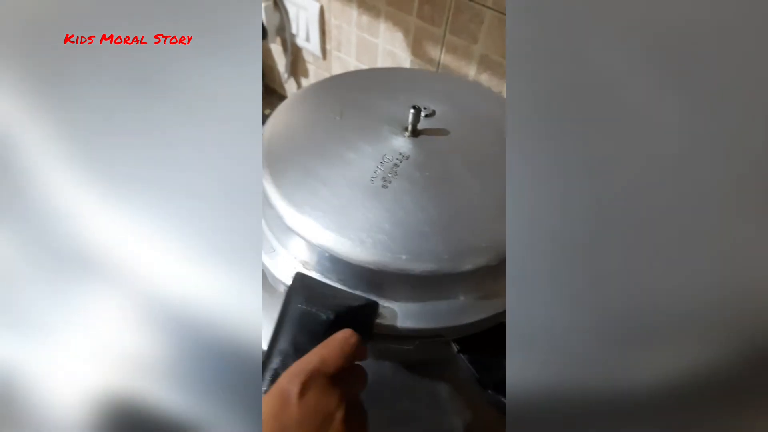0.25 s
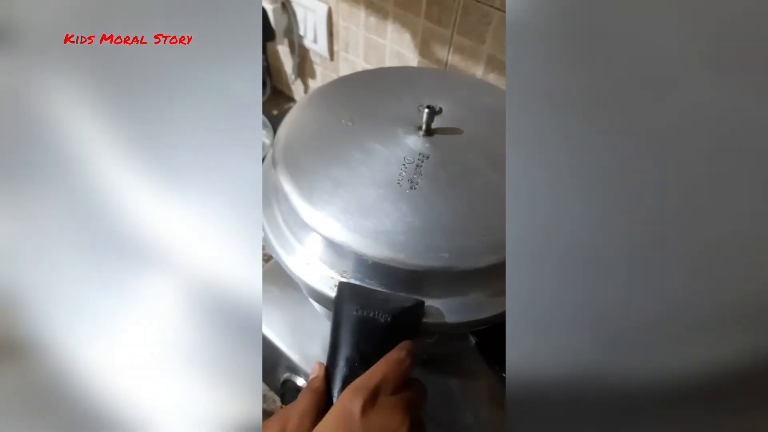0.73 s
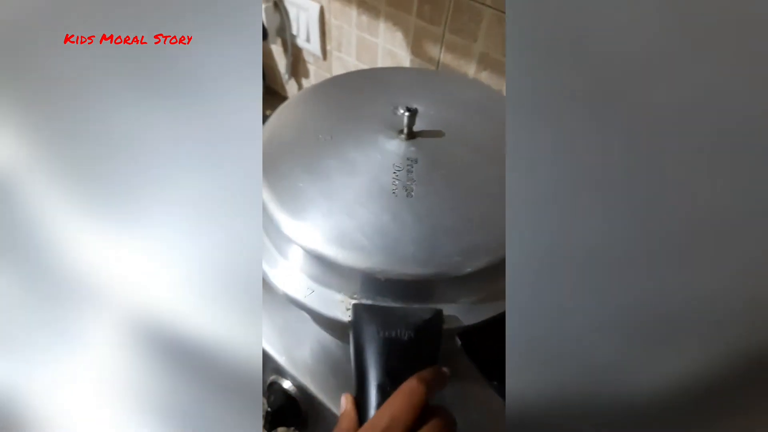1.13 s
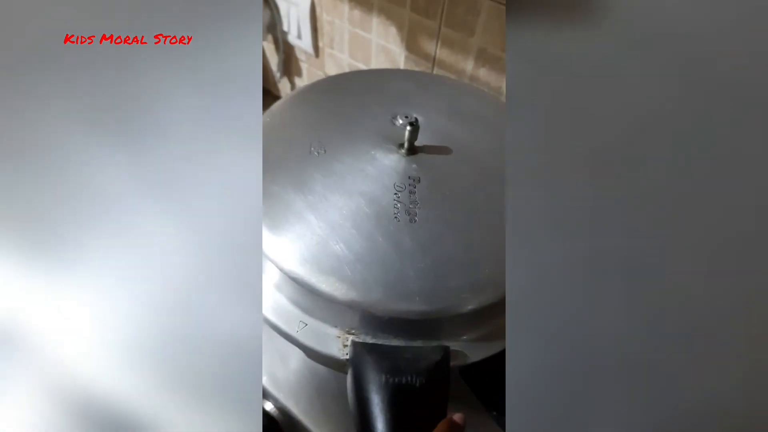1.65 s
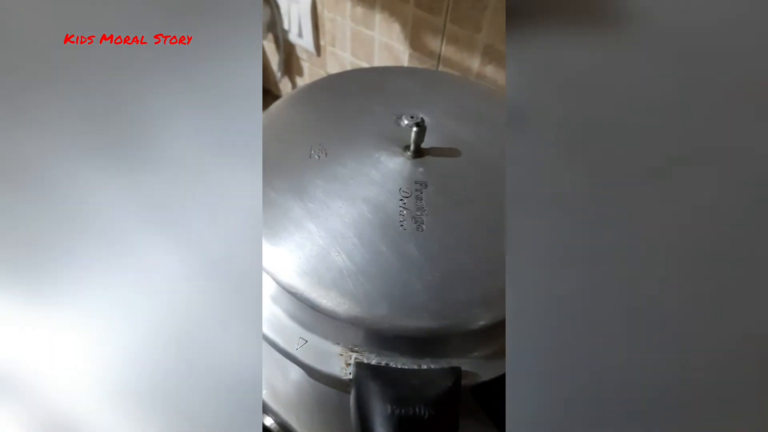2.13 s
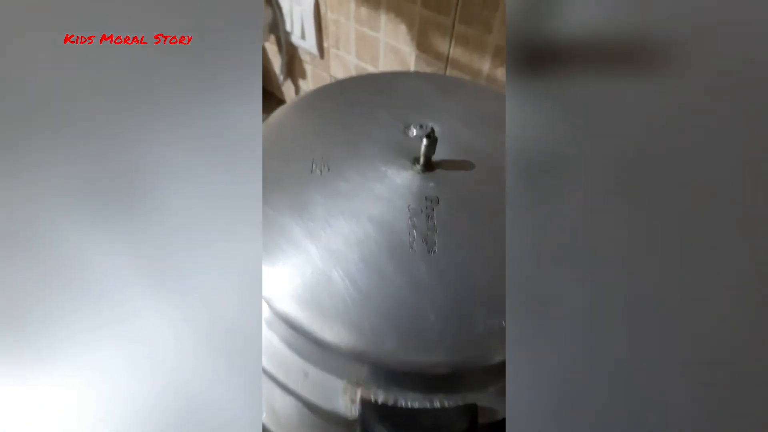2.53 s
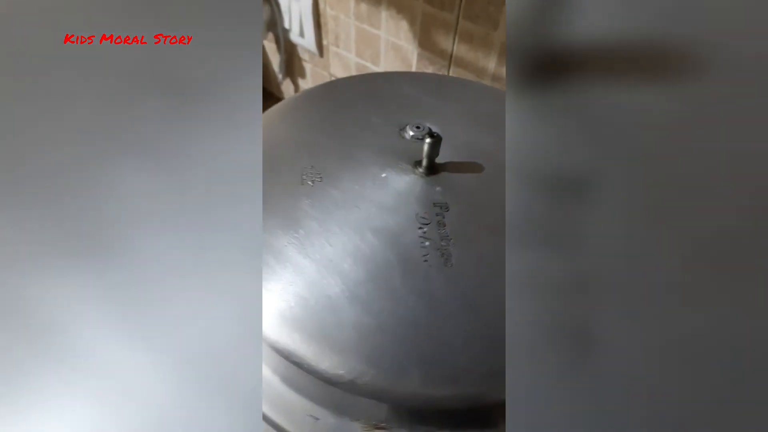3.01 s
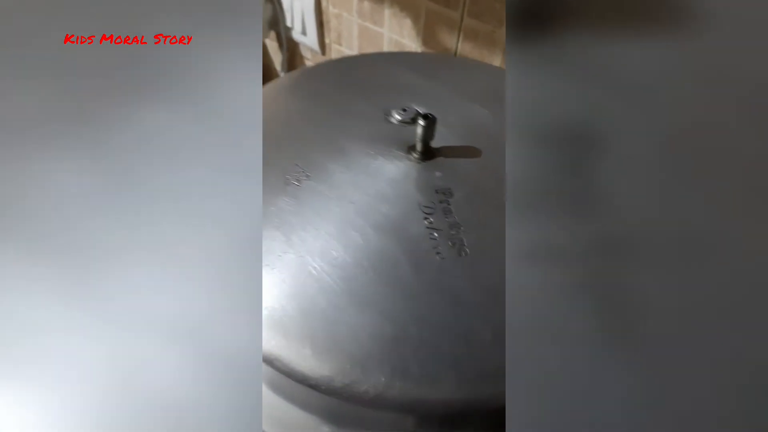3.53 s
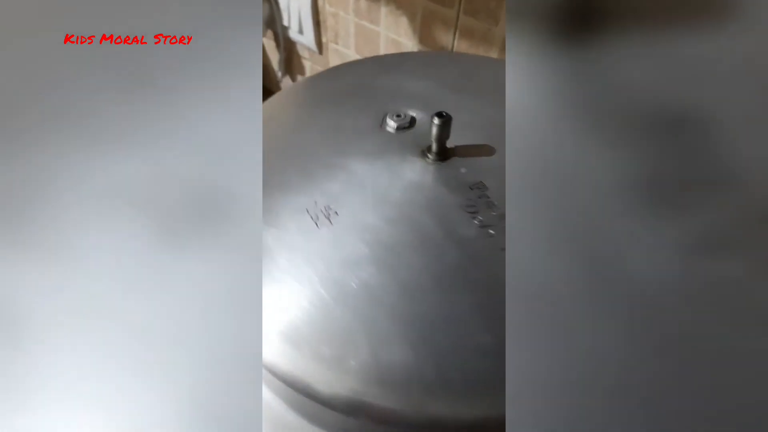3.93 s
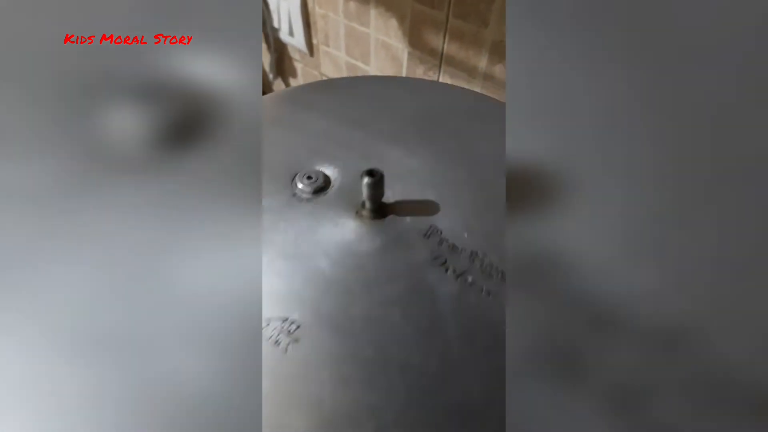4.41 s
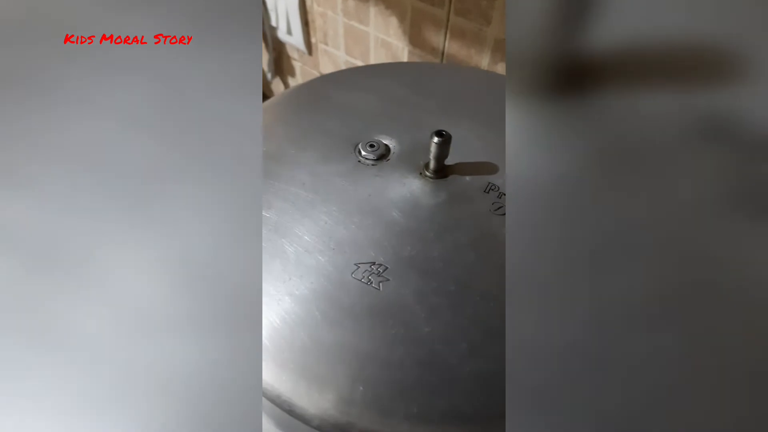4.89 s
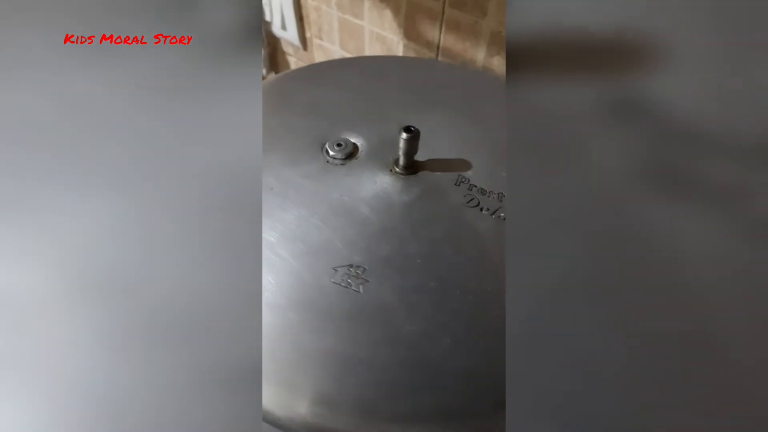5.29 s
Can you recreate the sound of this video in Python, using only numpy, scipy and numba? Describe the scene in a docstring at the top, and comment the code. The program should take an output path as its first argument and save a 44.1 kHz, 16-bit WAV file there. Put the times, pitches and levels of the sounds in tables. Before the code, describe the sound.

Close stereo sound of a heavy metal cooker lid being fitted in a small tiled kitchen, over a low wavering hum and thin air. From about 0.14 to 0.7 s irregular clanks come quickly, strongest near 0.15, 0.3 and 0.55 s, with loose rattle, short scrapes and a brief low groan of the pot wall. Until 1.4 s only soft knocks and a faint groaning drag remain. From 1.44 s scraping and medium clanks return, the groan swells near 1.53 s, and at 1.74 to 1.8 s the lid locks with the loudest, hard, clustered clank, its metallic ring dying quickly. It is nearly quiet from 2.2 to 2.9 s. Then faint grazing and light knocks follow, clearest at 3.48 and 3.81 s, with a barely audible breathy whine around 4 s. Separate bright taps land at 4.42, 5.22, 5.33 and 5.5 s as the hum rises.

```python
"""Cooker lid locked onto its pot

In a small tiled kitchen a metal lid is turned onto its pot on a stove: lugs knock and drag, the lid locks
with a clank, the pot is slid round and the lid is tapped. Knocks and friction ring one bank of damped metal
modes; the pot wall groans as gliding sines; rattle, sliding hiss and wall tail are noise in bands.
A low hum, thin room air and a faint whine of narrow noise lie underneath."""
import sys
import numpy as np
from numba import njit
from scipy import signal
from scipy.fft import rfft, irfft, next_fast_len
from scipy.io import wavfile

SR = 44100
rng = np.random.default_rng(int(sys.argv[2]) if len(sys.argv) > 2 else 0)


def inscribe(sig):
    """Save sig as 16-bit PCM at rate SR to the path in sys.argv[1].

    A 1-D sig is mono; a 2-D sig holds one channel per row.
    Samples are clipped to [-1, 1] before scaling.
    """
    pcm = np.round(np.clip(np.atleast_2d(sig).T, -1, 1) * 32767)
    wavfile.write(sys.argv[1], SR, pcm.astype(np.int16))


N = 244755
STEP = 24   # samples between gain values


def from_db(db):
    """Decibels to amplitude; twice the decibels give power."""
    return 10 ** (np.asarray(db) / 20)


def rms_one(x):
    """Scale a signal to rms 1."""
    return x / np.sqrt(np.mean(x ** 2) + 1e-20)


def in_time(rows):
    """Columns of a table as curves, one value a step; -120 outside the table."""
    s, *columns = np.transpose(rows)
    t = np.arange(N // STEP + 1) * STEP / SR
    return np.array([np.interp(t, s, c, -120, -120) for c in columns])


def every_sample(gain):
    """A gain given once a step, joined up by straight lines."""
    return np.interp(np.arange(N) / STEP, np.arange(len(gain)), gain)


def at_hz(points, hz):
    """Read a table of (hz, value) on a log frequency axis."""
    points = np.array(points)
    return np.interp(np.log(hz), np.log(points[:, 0]), points[:, 1])


def drift(rate):
    """Slow chance of spread 1, one value a step: white noise through two equal low-pass poles."""
    r = np.exp(-2 * np.pi * rate * STEP / SR)
    white = rng.standard_normal(N // STEP + 2001)
    return rms_one(signal.lfilter([1], [1, -2 * r, r * r], white)[2000:])


def dying(clicks, t60):
    """Each click starts an exponential decay."""
    return signal.lfilter([1], [1, -from_db(-60 * STEP / (t60 * SR))], clicks + 1e-18)


# Where stand, pot wall, lid dome, pot floor, rim and lugs ring most: centre_hz [Hz]
PART_HZ = [150, 258, 340, 480, 800, 1450]
# Knocks: start_s [s], level_db [dB, relative], then extra stand_db, wall_db, dome_db, lugs_db,
# hard_db (hardness of the contact) and rattle_db [dB]
KNOCKS = [(0.078, -57, 16.5, 25, 30, 14, 17.5, -13), (0.142, -6.5, -14, 4.5, -6.5, 8, 3, 2),
          (0.149, -11, 0, 1, 0, -10, -12, -23), (0.208, -15, -16, 7.5, -2, 6, -3, -13),
          (0.226, -24, 4, -14, 5, 18, 0, -2), (0.289, -8, -39, -4.5, -5.5, 0, -7.5, -5),
          (0.336, -28, -14, -10, -10, 10, -19, -10), (0.38, -21.5, -26, -13, -27, -9, -19, -28),
          (0.399, -25, -4, -5, -1, -9, -32, -1.5), (0.441, -41, -10, 0, -3, -20, -15, -12),
          (0.494, -19, -31, 3, 3, 3, -2, 0.5), (0.54, -31, 3, -27, 10.5, -18, 0, -23),
          (0.55, -9, -8, -12, -21, -8, -2, -11), (0.608, -39.5, 9, 23, 14, -10, -2, -10),
          (0.668, -27.5, 1.5, 8.5, 1, 6.5, 8.5, -7.5), (0.771, -41.5, 12, 2, -2.5, 2.5, -0.5, 3.5),
          (0.794, -29, 3.5, -2, -3, -20, -21, -4), (0.895, -45, 3, -9.5, -6, -12, -7, 1),
          (0.917, -32.5, 6, 7, -5, -14, -10, 5), (1.026, -35, 5, 7, 10, 6, 6.5, -8),
          (1.215, -44, 7.5, 12.5, 3.5, -2, -5, 2), (1.354, -65, 13, 26, -8, -4, 12, -8),
          (1.405, -45, 0, 11, 9, 5.5, 0, -18), (1.447, -18.5, -8, 2.5, -24, -4.5, -13, 2.5),
          (1.469, -21, -13, -2, -14, -3, -15, 2.5), (1.527, -13.5, -19, 7, 0, 7.5, -1, -4),
          (1.613, -27.5, 7, 16, 18.5, -13, 0, -7), (1.639, -36, -3, 15.5, 13, 5, 4, -0.5),
          (1.666, -19, -11, -3.5, -5, 6, -2.5, -4.5), (1.714, -42, 22, 20.5, 7, 21.5, -2, -12),
          (1.737, -4.5, 2.5, -0.5, -7.5, -0.5, 3.5, -5), (1.776, -12.5, 12.5, -6.5, -10, 0, -19, -16),
          (1.782, -5.5, 2.5, -15.5, -11, 1.5, -10.5, -12.5), (1.789, -8.5, 3.5, -10, -6.5, 1, -6.5, -12),
          (1.8, -12, -6, -12, -9.5, -2, -10.5, -15.5), (1.83, -30, 13.5, -17, -6, 5, 9, -12),
          (2.017, -38.5, -9, -15.5, 15, -2, 3, -8.5), (2.164, -52, 18, 6, 11, -14, 8.5, 3),
          (2.929, -61, 26.5, 7.5, 13.5, 12.5, 11.5, -9.5), (3.169, -47, -20.0, -17, 7.5, 8, -9, 6.5),
          (3.25, -33, 16.5, -39, 9, 8, 4, 0.5), (3.316, -58, 24, 13, 8.5, -7, -9, -20),
          (3.383, -53.5, 7, 7, 12, 8.5, -16, 6), (3.482, -28, 4, 4, 2.5, 2, -9.5, 7.5),
          (3.813, -29.5, 3, -6, -3.5, -6.5, -12.5, 3), (4.42, -10.5, -17, -19, -4, -4, -12.5, -0.5),
          (4.44, -22.5, -12, -17, 7, 3, -4, -8), (4.489, -51, -5, -12, 2, -16, -20.5, -5),
          (4.632, -60, 7.5, -18, -4.5, 12, 15.5, 0), (5.218, -11, -12, -8, 5, 4.5, -4.5, 2),
          (5.225, -22, -16.5, -2.5, 17, 1, -30, -9), (5.33, -8, -10, -14.5, 6.5, 1.5, -6, -6),
          (5.502, -12.5, -46, -16.5, -0.5, -8, -13, -1)]
HARD_FROM_HZ, HARD_FULL_HZ = 1900, 3000   # the treble that a hard contact brings out


def knock_db(hz):
    """Strength of every knock at one frequency: the parts it reaches ring louder, a hard contact is brighter."""
    rows = np.array(KNOCKS)
    # pot floor and rim get no extra of their own
    stand, wall, dome, _, _, lugs = [np.interp(np.log(hz), np.log(PART_HZ), one) for one in np.eye(len(PART_HZ))]
    hard = np.interp(np.log(hz), np.log([HARD_FROM_HZ, HARD_FULL_HZ]), [0, 1])
    return rows[:, 1] + rows[:, 2:7] @ [stand, wall, dome, lugs * (1 - hard), hard]


# Spots struck: start_s [s], then three pairs of mode_hz [Hz], extra_db [dB]
SPOTS = [(0.142, 1688, 4.5, 3300, -17, 2300, -3), (0.209, 740, -10, 2260, 4, 4400, 5),
         (0.289, 864, 6.5, 2930, 7.5, 2300, -3), (0.494, 880, 10.5, 2300, 14, 3200, 11),
         (0.55, 766.5, 3, 3200, 11, 2330, 7), (0.668, 1656, -8, 776, 3, 2300, -2),
         (1.446, 900, 1, 1860, 3, 3000, -5), (1.527, 1230, 9, 1860, 1, 3000, 9),
         (1.666, 880, 2.5, 1860, 3, 3000, -5), (1.737, 3380, -7, 7600, 12, 3800, 5),
         (1.781, 880, 10, 1240, 2.5, 1860, 4), (1.791, 880, 7, 1240, 6.3, 1860, 7.5),
         (1.8, 880, 5, 1390, 5, 1860, 4.5), (1.83, 3130, 6, 3700, 6, 4620, 6),
         (2.017, 3100, 4, 2350, -8, 4620, 3), (2.164, 3160, 12, 2500, 2, 4000, 4),
         (3.483, 890, 7, 1180, 9, 1630, 1), (3.813, 601, 6, 831, 0, 1240, 0.5),
         (4.42, 1260, 9.5, 3010, 18, 2280, 21), (4.438, 1235, 15, 2980, 11, 1640, 2),
         (5.218, 1390, 4, 1610, 5.5, 2570, 9.5), (5.33, 880, 6.5, 3750, 12, 4020, 13.5),
         (5.502, 870, 5.5, 3160, 12, 1260, 4)]
SPOT_WIDTH_OCTAVES = .05


def spot_db(hz):
    """A knock favours or muffles modes by the spot it lands on; one row a mode, one column a knock."""
    out, times = np.zeros((len(hz), len(KNOCKS))), np.array(KNOCKS)[:, 0]
    for s, *pairs in SPOTS:
        nearest = np.argmin(abs(times - s))
        for mode_hz, db in np.reshape(pairs, (-1, 2)):
            octaves = np.log2(hz / mode_hz)
            out[:, nearest] += db * np.exp(-(octaves / SPOT_WIDTH_OCTAVES) ** 2)
    return out


# Modes of stand, pot and lid: pitch_hz [Hz], level_db [dB], t60_s [s, at grip 1], left_lead_rad [rad],
# left_right_db [dB]
MODES_OF_COOKER = [(109, -3.5, 0.19, -0.5, 0.5), (138.3, -6.5, 0.13, -0.7, 1), (196, -9.5, 0.21, -0.85, 2),
                   (255, 3, 0.098, 0.31, -3), (334.3, -3.5, 0.19, 1, 0), (390.2, -15.5, 0.04, 0.5, 7.5),
                   (519, -10.5, 0.12, 1.23, 2), (646, -12, 0.09, -0.5, 3), (802, -8, 0.019, -1.54, -8.5),
                   (830, -5.5, 0.2, 1.62, -2), (881.2, -1.5, 0.1, 1.47, 2), (1000, -23.5, 0.042, 12, -0.5),
                   (1240, -16.5, 0.19, 7.5, 5.5), (1230, -3.5, 0.053, 1.37, -0.5),
                   (1292.5, -6, 0.062, 4, 0.5), (1470, -11, 0.11, 4, -9.5), (1640.5, -11.5, 0.32, 2, 2.5),
                   (1860, -14, 0.25, -2, -1.5), (2360, -23.5, 0.75, 4, 2), (2323, -23, 0.21, 2, -2.5),
                   (2530, -22.5, 0.11, 10.5, 2), (2996, -20, 0.45, 3, 3), (3230, -20, 0.11, 6, -2),
                   (3560, -19.5, 0.22, 9.5, -3.5), (3810, -23.5, 0.14, 2.5, -4),
                   (4054, -26.5, 0.076, 13, 2.5), (4360, -30.5, 0.14, 2, 0.5), (5086, -36, 0.56, 5.5, -3.5),
                   (5760, -32, 0.15, 3, -13.5), (7600, -35, 0.12, 9, 4.5), (1180, -14, 0.2, 2.5, 0),
                   (2068, -24, 0.033, 3, -0.5), (2940, -23, 0.69, 2.5, -0.5), (3140, -25.5, 0.33, 1.5, 0),
                   (3370, -23, 0.093, 1, 0), (4540, -30, 0.068, 3, -1), (4620, -31, 0.087, 2, -0.5),
                   (6750, -33, 0.12, 2.5, 0), (2445, -23, 0.18, -1.5, 0), (2765, -29, 0.2, -1.5, 0),
                   (3680, -27, 0.2, -1, 0), (3910, -26, 0.082, -0.5, 1)]
# The thicket of small modes: pitch_hz [Hz], level_db [dB], t60_s [s, before chance and grip]
SMALL_MODES = [(4200, -32, 0.16), (5500, -28.5, 0.13), (8600, -31.5, 0.12), (13500, -43.5, 0.075)]
CLACK_HZ, CLACK_DB, CLACK_T60_S = 740, 9, .022   # the contact itself, dead within some cycles


def all_modes(count):
    """The clack, the named modes, and small treble modes scattered by chance."""
    hz = np.geomspace(4200, 13000, count) * from_db(.12 * rng.standard_normal(count))
    table = np.array(SMALL_MODES)
    level_db = at_hz(table[:, :2], hz)
    t60 = at_hz(table[:, ::2], hz) * from_db(0.5 * rng.standard_normal(count))
    lead = rng.uniform(-np.pi, np.pi, count)
    pan_db = rng.standard_normal(count)
    small = np.transpose([hz, level_db, t60, lead, pan_db])
    return np.vstack([[(CLACK_HZ, CLACK_DB, CLACK_T60_S, 0, 0)], MODES_OF_COOKER, small])


@njit(fastmath=True)
def ring_bank(decay, turn, grip, step, ports, at, blows, part, rub):
    """Every mode is one complex pole, damped by the grip, driven by its blows and by the friction on its part."""
    out = np.zeros((2, rub.shape[1]))
    for k in range(len(decay)):
        force = rub[part[k]].astype(np.complex128)
        for j in range(at.shape[1]):
            force[at[k, j]] += blows[k, j]
        state = pole = 1e-18 + 0j
        for i in range(len(force)):
            if i % step == 0:
                pole = decay[k] ** grip[i // step] * turn[k]
            state = pole * state + force[i] + 1e-18
            out[0, i] += (state * ports[0, k]).imag
            out[1, i] += (state * ports[1, k]).imag
    return out


# The hand damps the metal: start_s [s], grip [factor on every decay rate]
GRIP = [(0, 1.1), (1.7, 1.05), (1.85, 0.85), (2.5, 0.94), (3.0, 1.2), (4.45, 1.18), (4.52, 1.3), (5.2, 1.1),
        (5.56, 1.07)]
HELD_T60_S = .33   # above 2 kHz the gasket allows no longer ring at grip 1
BUILD_UP_S, CONTACT_S = .0015, .0015   # first touch to the earliest blow; span over which the modes are hit
RING_DB = -9
UNEVEN_LOW_DB, UNEVEN_HIGH_DB = 8, 14   # chance range of the blows on each mode, below and above 2 kHz
CLACK_SHARE_DB, CLACK_UNEVEN_DB = -3, 3.5   # the bare contact within a knock, and its further chance range
CHATTER_DB, RIM_CHATTER_DB = -35, -45.5   # chatter of the lugs on the treble modes and on the rim modes


def cooker(drag):
    """Knocks and drags ring the same modes; each reaches left and right with its own phase and balance."""
    rows = np.array(KNOCKS)
    hz, level_db, t60, lead, pan_db = all_modes(count=60).T
    late, strength = np.transpose(rng.random((len(rows), 2, len(hz))), (1, 2, 0))
    late[0] = 0.45   # the clack comes near the middle of the contact
    at = ((rows[:, 0] + BUILD_UP_S + late * CONTACT_S) * SR).astype(int)

    spread_db = np.where(hz > 2000, UNEVEN_HIGH_DB, UNEVEN_LOW_DB)[:, None]
    uneven_db = spread_db * (strength - .5) + spot_db(hz)
    blows = from_db(np.array([knock_db(f) for f in hz]) + RING_DB + uneven_db)
    blows[0] *= from_db(spot_db(np.array([CLACK_HZ]))[0])   # the spot counts twice for the clack
    blows[0] *= from_db(CLACK_SHARE_DB + CLACK_UNEVEN_DB * (strength[1] - .5))
    blows[1::2] *= -1   # neighbouring modes start in opposite senses

    rub = []   # friction on stand, pot wall, rim, treble, and last the clack
    for level in drag:
        rough_level = every_sample(level * from_db(-36.0 + 1.3 * drift(17)))
        rub.append(rough_level * grit(per_s=2000, uneven_db=0.0))
    rub[3] = rub[3] + chatter(HARD_FULL_HZ, CHATTER_DB)
    rub.append(rub[2])   # the clack feels the drag alone
    rub[2] = rub[2] + chatter(PART_HZ[-1], RIM_CHATTER_DB)
    part = np.searchsorted([220, 450, 2000], hz)
    part[0] = len(rub) - 1

    t60 = np.where(hz > 2000, np.minimum(t60, HELD_T60_S), t60)
    decay, turn = from_db(-60 / (t60 * SR)), np.exp(2j * np.pi * hz / SR)
    ports = from_db(level_db + [pan_db / 2, -pan_db / 2]) * np.exp([.5j * lead, -.5j * lead])
    grip = np.clip(in_time(GRIP)[0], .5, 3)
    return ring_bank(decay, turn, grip, STEP, ports, at, blows, part, np.array(rub))


def grit(per_s, uneven_db):
    """Friction as dense clicks of random sign and uneven size; rms 1."""
    sizes = from_db(uneven_db * np.minimum(rng.exponential(1, N), 4)) * rng.choice([-1, 1], N)
    return rms_one(sizes * (rng.random(N) < per_s / SR))


CHATTER_PER_S, CHATTER_UNEVEN_DB, CHATTER_T60_S = 700, 3, 0.28


def chatter(hz, db):
    """Loose lugs chatter on the modes: uneven after-touches that fade behind every knock."""
    rows, kicks = np.array(KNOCKS), np.zeros(N // STEP + 1)
    just_after = (rows[:, 0] * SR / STEP).astype(int) + 4
    kicks[just_after] = from_db(knock_db(hz) + rows[:, 7] + db)
    touches = grit(per_s=CHATTER_PER_S, uneven_db=CHATTER_UNEVEN_DB)
    return every_sample(dying(kicks, CHATTER_T60_S)) * touches


# Strokes of metal dragging on metal: start_s [s, full from here], held_s [s],
# stand_db, wall_db, rim_db, hiss_db [dB, relative]
STROKES = [(0.0, 0.08, -70, -45.5, -51, -47.5), (0.299, 0.017, -41, -31, -59, -48),
           (0.546, 0.057, -34, -30, -33.5, -43.5), (0.74, 0.041, -51, -63, -63, -50.5),
           (0.967, 0.093, -47, -46.5, -52, -58), (1.435, 0.11, -36, -41.5, -43, -50.5),
           (1.55, 0.082, -53, -32.5, -37, -49), (1.782, 0.015, -16.5, -29, -27, -30),
           (1.863, 0.016, -50, -29, -30.5, -33), (2.198, 0.049, -70, -51, -61, -66.5),
           (2.928, 0.049, -56.5, -63, -70.5, -57.5), (3.02, 0.17, -62.5, -58.5, -56.5, -59),
           (3.11, 0.047, -68, -62, -57, -50), (3.17, 0.13, -56, -53, -49, -52.5),
           (3.29, 0.045, -40, -55, -73, -81), (3.52, 0.062, -44.5, -48, -51, -55.5),
           (3.638, 0.21, -47.5, -50.5, -51.5, -47.5), (4.43, 0.11, -55, -63.5, -60.5, -57.5)]
# Fade of a stroke on stand, pot wall, rim, hiss: let_go [dB per s]
LET_GO_DB_PER_S = [153, 114, 137, 151]
PRESS_DB_PER_S = 173   # a stroke swells in


def strokes():
    """Each stroke of the drag swells, holds and fades; gain on stand, pot wall, rim and hiss."""
    t, power = np.arange(N // STEP + 1) * STEP / SR, 0
    for start, held, *part_db in STROKES:
        early, over = np.maximum(start - t, 0), np.maximum(t - start - held, 0)
        swell_db = np.array(part_db)[:, None] - PRESS_DB_PER_S * early
        power = power + from_db(2 * (swell_db - np.outer(LET_GO_DB_PER_S, over)))
    return np.sqrt(power)


# Groans of the pot wall under the dragging lid, one list each: start_s [s], pitch_hz [Hz], level_db [dB]
GROANS = [
    [(0.0, 249, -41), (0.02, 243, -50), (0.032, 245, -44), (0.076, 244, -55), (0.082, 247, -44),
     (0.096, 241, -55), (0.104, 242, -51), (0.126, 239, -41), (0.135, 236, -38)],
    [(0.23, 267, -45), (0.246, 274, -28), (0.26, 258, -25), (0.28, 242, -55), (0.292, 256, -27),
     (0.326, 259, -61), (0.404, 240.4, -40), (0.434, 280, -45), (0.47, 278, -46)],
    [(0.9, 246, -63), (0.93, 242, -30.5), (0.956, 253, -38), (0.972, 244, -44), (0.99, 232.4, -32),
     (1.034, 245.5, -46), (1.046, 262, -33), (1.12, 265, -66), (1.13, 268, -48.5)],
    [(1.34, 255, -69), (1.356, 241, -55), (1.382, 246.6, -35), (1.406, 263.3, -41.5), (1.492, 262, -27.5),
     (1.514, 263, -40), (1.522, 262, -20.5), (1.536, 254.3, -14.5), (1.55, 254, -17)],
    [(1.55, 256.9, -32), (1.566, 257, -39), (1.578, 258.5, -27), (1.636, 250.4, -27.5), (1.676, 256, -49),
     (1.688, 251, -47), (1.702, 245, -57), (1.72, 244, -17.5), (1.735, 241.8, -23)],
]
GROAN_WAVER_DB = 1


def groan():
    """Stick and slip locks onto the pot wall and makes it sing one low, wavering note."""
    out = 0
    for rows in GROANS:
        s, hz, _ = np.transpose(rows)
        turns = np.cumsum(np.interp(np.arange(N) / SR, s, hz)) / SR
        level = from_db(in_time(rows)[1] + GROAN_WAVER_DB * drift(25))
        out = out + every_sample(level) * np.sin(2 * np.pi * turns)
    return np.sqrt(2) * out * from_db([[-1.5], [1.5]])   # stronger on the right


# Colour of rattle, tick and tail: pitch_hz [Hz], level_db [dB per Hz, relative]
CRACK = [(70, -32), (150, -4), (400, -3), (900, -1), (2000, -10), (4000, -21.5), (8000, -21.5),
         (13500, -38.5)]
# Tail of the tiled walls: pitch_hz [Hz], t60_s [s]
TAIL_T60 = [(100, 0.51), (400, 0.17), (1000, 0.49), (3000, 1), (5000, 1), (8000, 0.55), (13000, 0.2)]
CRACK_DB, CRACK_T60_S, TAIL_DB = 5, 0.071, -9.5
TAIL_TREBLE_DB = -5   # above 600 Hz the metal's own ring covers rattle and walls
TICK_DB, TICK_T60_S, TICK_FROM_HZ, TICK_DB_PER_OCTAVE = 12, 0.028, 2300, -4.5   # sharp edge of each knock


def cracks(hz, together):
    """Power in a band: each knock ticks, loose parts rattle unevenly, the tiled walls leave a tail."""
    rows, power = np.array(KNOCKS), np.zeros(N // STEP + 1)
    at = ((rows[:, 0] + BUILD_UP_S) * SR / STEP).astype(int) + 1
    hit_db = knock_db(hz) + at_hz(CRACK, hz)
    power[at] = from_db(2 * (hit_db + rows[:, 7]))
    treble_db = TAIL_TREBLE_DB * (hz > 600)
    # halved t60: these decays are of power
    rattle_gain = from_db(2 * (CRACK_DB + treble_db) + 3.0 * (together + drift(60)))
    rattle = rattle_gain * dying(power, CRACK_T60_S / 2)
    edge = np.zeros_like(power)
    tick_db = TICK_DB + TICK_DB_PER_OCTAVE * np.log2(hz / TICK_FROM_HZ)
    edge[power > 0] = from_db(2 * (hit_db + tick_db)) * (hz > TICK_FROM_HZ)
    tail = from_db(2 * (TAIL_DB + treble_db)) * dying(power, at_hz(TAIL_T60, hz) / 2)
    return dying(edge, TICK_T60_S / 2) + rattle + tail


# Noise of sliding faces: pitch_hz [Hz], level_db [dB per Hz, relative]
RUSH = [(70, 8), (150, 10.5), (300, 3.5), (600, -4.5), (1200, -11), (2000, -13), (3000, -15), (8000, -11.5),
        (13500, -21.5)]


def drag_hiss(hz, drag, together):
    """Power in a band: the grainy rush of sliding faces follows the part that sounds there."""
    part = np.searchsorted([220, 450, 1800], hz)
    return (drag[part] * from_db(at_hz(RUSH, hz) + 8.5 + 1.9 * (together + drift(15)))) ** 2


THROUGH_DB, THROUGH_PEAK_DB = -4, 9
THROUGH_HALF_WIDTH_HZ = 20


def through_metal(noise):
    """Noise borne by the cooker takes on a resonant peak at each of its modes above 600 Hz."""
    size = next_fast_len(N + SR // 2)
    hz = np.arange(size // 2 + 1) * SR / size
    upper = [mode[0] for mode in MODES_OF_COOKER if mode[0] > 600]
    peaks = sum(1 / (1 + 1j * (hz - mode_hz) / THROUGH_HALF_WIDTH_HZ) for mode_hz in upper)
    coloured = rfft(noise, size) * (1 + from_db(THROUGH_PEAK_DB) * peaks)
    return from_db(THROUGH_DB) * irfft(coloured, size)[:, :N]


# Stereo width: pitch_hz [Hz], likeness [left-right correlation, -1 to 1]
LIKENESS = [(100, 0.98), (300, 0.78), (700, -0.08), (1200, 0.34), (2000, 0.75), (12000, 0.085)]


def banded_noise(power_at):
    """Half-octave bands of stereo noise; power_at(hz) gives each band its power in time."""
    out, edges = 0, 30 * 2 ** np.arange(.5, 9.1, .5)
    white = rng.standard_normal((2, 2, N))   # neighbouring bands draw on different noise
    for k, (low, high) in enumerate(zip(edges, edges[1:])):
        hz = np.sqrt(low * high)
        band = signal.butter(2, [low, high], "band", fs=SR, output="sos")
        mid, side = signal.sosfilt(band, white[k % 2])
        alike = np.clip(at_hz(LIKENESS, hz), -1, 1)
        stereo = np.sqrt(1 + alike) * mid + np.sqrt(1 - alike) * side * [[1], [-1]]
        out = out + every_sample(np.sqrt(power_at(hz))) * stereo
    return out


# Bands of the whine: pitch_hz [Hz], width_hz [Hz], level_db [dB, relative]
WHINE = [(1375, 52, -4), (2820, 170, -10), (3460, 180, -20)]
# Whine in time: start_s [s], level_db [dB]
WHINE_LEVEL = [(3.88, -65), (3.95, -58), (4.34, -64.5), (4.42, -74)]


def whine():
    """A faint, breathy tone: three narrow bands of noise that swell and fade together."""
    white = rng.standard_normal((2, N))
    tones = 0
    for hz, width, db in WHINE:
        band = signal.butter(2, [hz - width / 2, hz + width / 2], "band", fs=SR, output="sos")
        tones = tones + from_db(db) * rms_one(signal.sosfilt(band, white))
    return every_sample(from_db(in_time(WHINE_LEVEL)[0])) * tones


# Colour of the hum: pitch_hz [Hz], level_db [dB per Hz, relative]
HUM = [(30, 14.5), (60, 11.5), (100, 12), (160, -6.5), (300, -10), (500, -20.5), (1000, -24.5), (2000, -62),
       (14000, -92.5)]
# Hum in time: start_s [s], level_db [dB, relative]
HUM_LEVEL = [(0.0, -51), (0.63, -46), (1.3, -62), (1.8, -49), (2.52, -57.5), (3.14, -56.5), (3.45, -58.5),
             (3.74, -50), (3.9, -49), (5.25, -41), (5.41, -37), (5.56, -30)]
# Colour of the room air: pitch_hz [Hz], level_db [dB per Hz, relative]
AIR = [(300, -30), (700, -3), (2000, -1), (2900, 3), (5000, -1), (9000, 0), (13500, -8)]
# Room air in time: start_s [s], level_db [dB, relative]
AIR_LEVEL = [(0, -68), (2.4, -76), (2.7, -76), (3.0, -69), (4.05, -67), (4.3, -71), (4.5, -68), (4.7, -71),
             (5.56, -71)]
HUM_SHAKEN_DB = -18.5   # the hum swells with the shaking of the stand


def background(hz, stand):
    """Power in a band: a wavering low hum and thin room air."""
    hum_level = from_db(in_time(HUM_LEVEL)[0]) + from_db(HUM_SHAKEN_DB) * stand
    hum = hum_level * from_db(at_hz(HUM, hz) + 4.0 + 0.58 * drift(9.4))
    return hum ** 2 + from_db(2 * (in_time(AIR_LEVEL)[0] + at_hz(AIR, hz)))


LEFT_DB = -1.4   # left against right


def scene():
    """All sources, weighted a little to the right."""
    drag, together = strokes(), drift(26)   # "together" is the unevenness that all bands share
    borne = through_metal(banded_noise(lambda hz: cracks(hz, together) + drag_hiss(hz, drag, together)))
    room = banded_noise(lambda hz: background(hz, drag[0]))
    return (cooker(drag) + borne + room + groan() + whine()) * from_db([[LEFT_DB / 2], [-LEFT_DB / 2]])


MIC_LOW_HZ, CUTOFF_HZ = 86.6, 14000


def record(dry):
    """The microphone drops the deep bass, peaks are rounded, the top is cut."""
    heard = signal.sosfilt(signal.butter(3, MIC_LOW_HZ, "high", fs=SR, output="sos"), dry)
    rounded = 1.306 * np.tanh(heard / 1.475)
    return signal.sosfilt(signal.cheby2(12, 45, CUTOFF_HZ, fs=SR, output="sos"), rounded)


dry = scene()
out = record(dry)
inscribe(out)
```